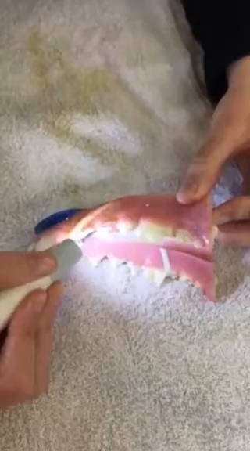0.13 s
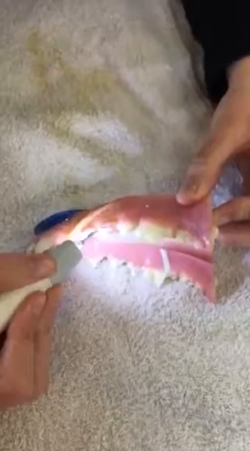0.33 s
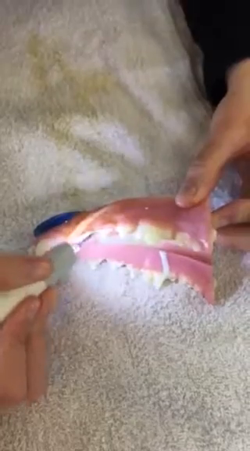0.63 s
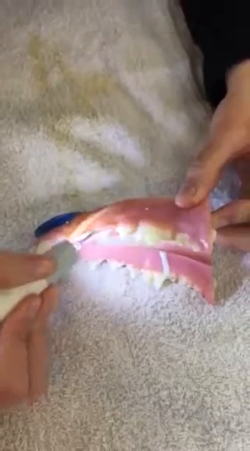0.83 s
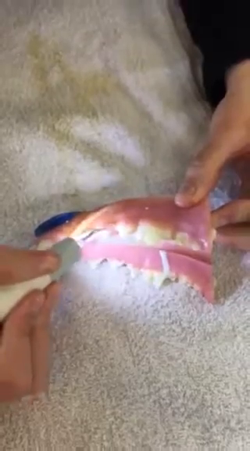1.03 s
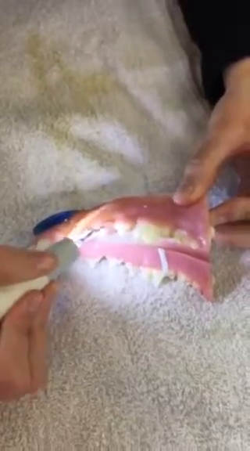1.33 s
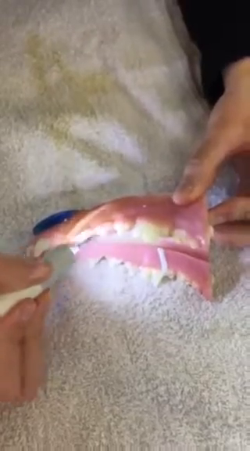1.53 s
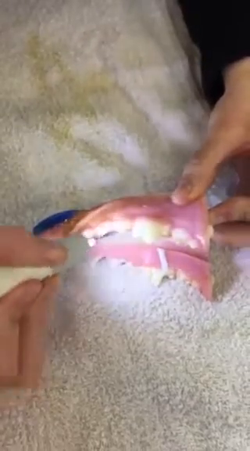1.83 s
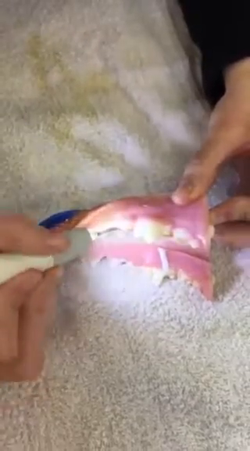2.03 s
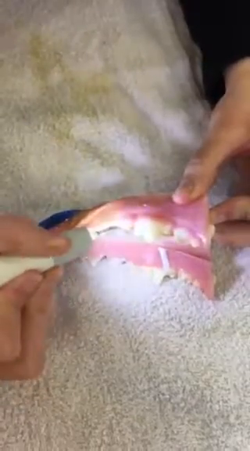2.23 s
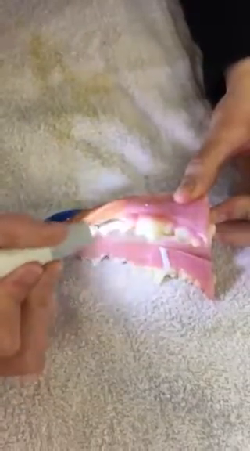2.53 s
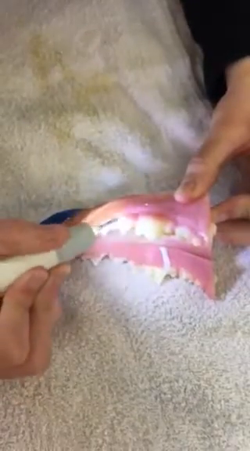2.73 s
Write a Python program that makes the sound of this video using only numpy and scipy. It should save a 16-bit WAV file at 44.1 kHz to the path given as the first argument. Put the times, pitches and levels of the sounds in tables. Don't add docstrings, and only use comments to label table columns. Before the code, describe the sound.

A dental scaler sprays a steady bright hiss with quick wet ticks close to the microphone; sharp squeals come early, then soft bumps and cloth rubs as hands shift the tooth model on a towel.

```python
import sys
import numpy as np
from scipy import signal
from scipy.fft import rfft, irfft
from scipy.io import wavfile
from scipy.ndimage import uniform_filter1d

SR = 44100
rng = np.random.default_rng(int(sys.argv[2]) if len(sys.argv) > 2 else 0)


def attenuation_scalar(level_db):
    decades = np.asarray(level_db, float) / 20
    return 10 ** decades


def persist_wave(psi):
    counts = np.round(np.clip(psi, -1, 1) * 32767).astype(np.int16)
    wavfile.write(sys.argv[1], SR, np.atleast_2d(counts).T)


N = 127890


def evened(x):
    return x / np.sqrt(np.mean(x ** 2) + 1e-20)


def curve(points, col=1):
    rows = np.array(points)
    return np.interp(np.arange(N) / SR, rows[:, 0], rows[:, col])


def add(mix, s, sound):
    part = mix[max(round(s * SR), 0):][:len(sound)]
    part += sound[:len(part)]


def coloured(x, points):
    hz, db = np.transpose(points)
    at = np.log(np.fft.rfftfreq(len(x), 1 / SR) + 1)
    gain = attenuation_scalar(np.interp(at, np.log(hz), db, right=-70))
    return evened(irfft(rfft(x) * gain, len(x)))


def bell(hz, centre_hz, width):
    return 1 / (1 + (2 * (hz - centre_hz) / width) ** 2)


def rung(x, modes):
    hz = np.fft.rfftfreq(len(x), 1 / SR)
    gain = sum(attenuation_scalar(db) * bell(hz, f, w) for f, w, db in modes)
    return irfft(rfft(x) * gain, len(x))


def wander(smooth_s):
    size = max(int(smooth_s * SR), 1)
    once = uniform_filter1d(rng.standard_normal(N), size)
    return evened(uniform_filter1d(once, size))


def grainy(per_s, spread_db, share):
    size = attenuation_scalar(spread_db * np.minimum(rng.exponential(1, N), 5))
    size = size * (rng.random(N) < per_s / SR)
    grains = evened(size * rng.choice([-1, 1], N))
    return (1 - share) * rng.standard_normal(N) + share * grains


def swell(length, rise):
    u = np.arange(0, 1, 1 / (length * SR))
    return np.sin(np.pi * u ** rise) ** 1.2


# time in seconds, spray level in dB, contact from 0 free to 1 pressed on the tooth.
MIST = [(0, -51, 0.41), (.1, -49.5, 0.61), (.2, -51.5, 0.3), (.5, -52.5, 1), (.56, -49, 0.046),
        (1.14, -48, 0.059), (1.21, -49, 0.86), (1.58, -53, 0.63), (1.68, -48.5, 0.019), (1.9, -47, 0.13),
        (2.05, -50, 0.16), (2.5, -49, 0.096), (2.9, -51, 0.26)]
# resonance in Hz, width in Hz, level in dB.
FREE_TIP = [
    (5940, 510, 4),
    (5280, 610, 0),
    (7077, 620, 5),
    (4830, 1400, -18),
    (2400, 300, -30),
]
# resonance in Hz, width in Hz, level in dB.
PRESSED_TIP = [
    (6460, 450, 6),
    (9013, 1780, 3.5),
    (3910, 1790, 0.5),
    (8160, 400, -13),
    (2880, 1200, -35),
]


def spray():
    contact = np.clip(curve(MIST, col=2), 0, 1)
    free = rung(grainy(per_s=2500, spread_db=2, share=.4), FREE_TIP)
    pressed = rung(grainy(per_s=2500, spread_db=2, share=.4), PRESSED_TIP)
    mix = np.sqrt(1 - contact) * free + np.sqrt(contact) * pressed
    level_db = curve(MIST) + 1.5 + 1.6 * wander(.012)
    return mix / np.std(free) * attenuation_scalar(level_db)


# time in seconds, effort in dB.
EFFORT = [(0, -63), (.15, -56), (.3, -65.5), (.62, -70.5), (.9, -55), (1.06, -57), (1.2, -64), (1.42, -55),
          (1.6, -59.5), (1.76, -73.5), (1.9, -61.5), (2.02, -50), (2.15, -57), (2.55, -56), (2.68, -65.5),
          (2.9, -59)]
# frequency in Hz, level in dB per Hz.
RUMBLE_COLOUR = [(20, -45), (40, -5), (70, 3), (200, -9.5), (500, -20), (1200, -29.5), (4000, -27.5)]
# frequency in Hz, level in dB per Hz.
TOWEL_COLOUR = [(100, -5), (350, -5), (700, -6), (1200, -15), (2600, -19.5), (4500, -17.5)]


def hands():
    effort_db = curve(EFFORT)
    lift_db = effort_db - effort_db.mean()
    rumble_db = -50.5 + 0.33 * lift_db + 1.2 * wander(0.02)
    rumble = coloured(rng.standard_normal(N), RUMBLE_COLOUR) * attenuation_scalar(rumble_db)
    towel_db = effort_db + .4 * lift_db - 1.5 + 2.8 * wander(.01)
    towel = coloured(grainy(per_s=500, spread_db=2.2, share=.4), TOWEL_COLOUR) * attenuation_scalar(towel_db)
    return rumble + towel


def crackle():
    per_s, level_db = 90, -61
    size = attenuation_scalar(3 * np.minimum(rng.exponential(1, N), 3)) * (rng.random(N) < per_s / SR)
    burst = signal.oaconvolve(size, np.hanning(130), "same") * rng.standard_normal(N)
    return attenuation_scalar(level_db) * evened(rung(burst, [(4430, 2600, 4.5), (2400, 570, -5.5)]))


# start in seconds, level in dB, pitch in Hz.
SOFT_BUMPS = [(0.003, -37.5, 177), (.137, -40.5, 110), (.482, -43, 170), (0.523, -46.5, 118),
              (0.635, -44.5, 180), (0.858, -37.5, 137), (0.883, -34, 110), (0.906, -38, 200),
              (.924, -37, 200), (0.933, -37.5, 110), (1.019, -38, 190), (1.073, -41, 250),
              (1.088, -39.5, 250), (1.137, -42.5, 110), (1.283, -40, 102), (1.349, -41.5, 108),
              (1.499, -40.5, 102), (1.512, -40, 110), (1.589, -40, 148), (1.635, -34.5, 137),
              (1.737, -49.5, 130), (1.841, -40, 190), (1.978, -35, 110), (1.994, -36, 90),
              (2.149, -34, 120), (2.182, -34, 105), (2.591, -35.5, 150), (2.779, -32.5, 102),
              (2.875, -38, 196), (2.887, -34.5, 129)]


def bumps():
    attack_s, sweep_s, sweep_turns, decay_cycles = 0.0014, .0022, 1.0, 0.8
    out, t = np.zeros(N), np.arange(0, .04, 1 / SR)
    for s, db, hz in SOFT_BUMPS:
        turns = hz * t + sweep_turns * (1 - np.exp(-t / sweep_s))
        shape = np.minimum(t / attack_s, 1) * np.exp(-t * hz / decay_cycles)
        add(out, s, attenuation_scalar(db + 0.5) * np.sin(2 * np.pi * turns) * shape)
    return out


# time in seconds, splash in dB, low ring in dB, low ring pitch in Hz.
EARLY_TICKS = [(0.086, -42, -48, 2150), (0.1194, -40, -47, 2030), (0.188, -41.5, -49, 2314),
               (0.3833, -36, -64, 2960), (0.415, -34.5, -57, 3140), (0.5326, -45, -51, 2480),
               (0.5631, -53, -72, 2970), (0.622, -37, -53, 2910), (0.6516, -39, -68, 2090),
               (0.6784, -62, -51, 2260), (0.7023, -58, -53, 1970), (0.726, -41.5, -49.5, 2370),
               (0.763, -44, -43.5, 2155), (0.8088, -35.5, -47, 2150), (0.844, -45, -52, 1940),
               (0.886, -44, -51, 2550), (0.9044, -39, -56, 2240), (0.9287, -39, -48.5, 2370),
               (0.974, -45, -68, 1980), (0.9866, -48, -44.5, 3230), (1.0152, -46, -45, 3010),
               (1.092, -44, -50, 3020), (1.1358, -51, -54, 2850), (1.2392, -41.5, -50, 2520),
               (1.2964, -43, -66, 1930), (1.3474, -39, -52, 2500), (1.3542, -34, -60, 3020),
               (1.4074, -51, -54, 2400)]
# time in seconds, splash in dB, low ring in dB, low ring pitch in Hz.
LATE_TICKS = [(1.4497, -41.5, -63, 2960), (1.5, -38, -49, 2430), (1.5928, -42, -54, 3100),
              (1.6342, -35.5, -49.5, 2340), (1.6404, -46, -41.5, 3210), (1.6744, -46, -56, 2320),
              (1.687, -34, -54, 2400), (1.76, -38, -72, 2930), (1.8083, -56, -56, 2790),
              (1.886, -51, -59, 2960), (1.9435, -51, -49, 2400), (1.9895, -45, -50, 1900),
              (2.0174, -48, -56, 2130), (2.044, -40, -55, 2350), (2.1266, -38.5, -50, 2520),
              (2.1624, -51, -49, 3220), (2.3094, -36, -45.5, 2110), (2.3516, -50, -47, 2080),
              (2.475, -49, -45, 2510), (2.525, -39, -58, 2280), (2.5711, -52, -57, 1940),
              (2.6497, -40, -49.5, 2080), (2.6614, -39, -54, 2250), (2.6955, -35, -66, 3200),
              (2.7464, -42, -55, 3060), (2.7789, -38, -48.5, 2960), (2.831, -34.5, -49, 2880),
              (2.8739, -39.5, -54, 2230)]


def ticks():
    rise_s, fall_s = .004, .0035
    out, t = np.zeros(N), np.arange(0, .03, 1 / SR)
    release = np.exp(-(np.maximum(t - rise_s, 0) / fall_s) ** 2 / 2)
    shape = np.minimum(t / rise_s, 1) ** 2 * release
    for s, db, low_db, hz in EARLY_TICKS + LATE_TICKS:
        splash_noise, ring_noise = rng.standard_normal((2, len(t)))
        splash = evened(rung(splash_noise, [(4400, 800, 0), (5900, 900, -5)]))
        ring = .4 * np.sin(2 * np.pi * hz * t) + .5 * evened(rung(ring_noise, [(hz, 500, 0)]))
        add(out, s - .002, shape * (attenuation_scalar(db - 7.5) * splash + attenuation_scalar(low_db + 3.0) * ring))
    return out


def squeal(rows, modes_hz, roughs, rise):
    out = np.zeros(N)
    for s, length, *levels in rows:
        shape = swell(length, rise)
        t = s + np.arange(len(shape)) / SR
        noise = rng.standard_normal((5, 4096))
        flutter = attenuation_scalar(2.16 * evened(uniform_filter1d(noise[4], size=90))[:len(t)])
        for hz, rough, db, v in zip(modes_hz, roughs, levels, noise):
            chatter = evened(rung(v, [(hz, 480, 0)])[:len(t)])
            glide_s = t + 0.36 * (t - s) ** 2
            tone = np.sqrt(2) * np.sin(2 * np.pi * hz * glide_s)
            voice = evened(flutter * ((1 - rough) * tone + rough * chatter))
            add(out, s, attenuation_scalar(db - 1.0) * shape * voice)
        rattle_modes = [(2450, 300, 0), (0.95 * modes_hz[1], 1200, 3), (3200, 700, -4)]
        rattle = evened(rung(noise[3], rattle_modes)[:len(t)])
        add(out, s, attenuation_scalar(levels[1] - 16.5) * shape * rattle)
    return out


# start in seconds, length in seconds, low, middle and high mode in dB.
ROUGH_SQUEALS = [
    (.115, 0.061, -52, -45.5, -46),
    (.233, 0.017, -44, -39, -38),
    (.243, 0.011, -45, -44, -40),
    (.284, .012, -46, -43, -44),
    (.444, 0.016, -46, -47, -40),
    (.455, 0.029, -31, -32.5, -33.5),
    (.490, 0.016, -37, -36.5, -36.5),
    (.506, 0.02, -42, -32, -36.5),
    (.322, 0.017, -47, -44.5, -44),
    (.349, 0.009, -62, -39, -54),
]
# start in seconds, length in seconds, low, middle and high mode in dB.
CLEAN_SQUEALS = [
    (.294, 0.035, -45, -30.5, -32.5),
    (.300, 0.022, -29, -62, -62),
    (.34, 0.0084, -56, -38, -41),
]
# start in seconds, length in seconds, low, middle and high mode in dB.
BITING_SQUEAL = [
    (.491, 0.044, -52, -31, -34.5),
]


def tip_squeals():
    tip_hz, chattering, gripping = (4190, 5970, 8480), (.9, 0.7, 0.7), (.2, .3, .35)
    rough = squeal(ROUGH_SQUEALS, tip_hz, chattering, rise=0.73)
    clean = squeal(CLEAN_SQUEALS, tip_hz, gripping, rise=.9)
    return rough + clean + squeal(BITING_SQUEAL, tip_hz, gripping, rise=0.62)


# start in seconds, level in dB, fall time in seconds.
CLOTH_DRAGS = [
    (2.234, -34, 0.047),
    (2.412, -36.5, 0.056),
    (2.215, -48, .02),
    (2.33, -54, 0.092),
    (2.005, -50.5, 0.064),
    (2.09, -50.5, 0.11),
    (.995, -53, .06),
    (.7, -55.5, .03),
]
# frequency in Hz, level in dB per Hz.
CLOTH_COLOUR = [(200, -30), (500, -5), (1000, -5), (1800, -1), (3080, -4), (3220, -21), (4500, -19),
                (6000, -30)]
# frequency in Hz, width in Hz, level in dB.
PLASTIC_BODY = [
    (175, 70, 0),
    (330, 120, -7),
    (520, 200, -12),
]


def drags():
    rise_s, body_lag_s, body_db = 0.018, .013, -2.5
    t, shape = np.arange(0, .3, 1 / SR), np.zeros(N)
    for s, db, fall_s in CLOTH_DRAGS:
        trail = np.exp(-np.maximum(t - rise_s, 0) / fall_s)
        add(shape, s, attenuation_scalar(db) * np.minimum(t / rise_s, 1) ** 2 * trail)
    boom = evened(rung(rng.standard_normal(N), PLASTIC_BODY))
    body = attenuation_scalar(body_db) * np.roll(shape, round(body_lag_s * SR)) * boom
    return shape * coloured(grainy(per_s=1800, spread_db=1.8, share=0.4), CLOTH_COLOUR) + body


# start in seconds, length in seconds, low, middle and high mode in dB.
GAP_SQUEAL = [
    (1.169, .016, -33, -42, -33),
    (1.158, .056, -62, -60, -45),
]


def gap_squeal():
    return squeal(GAP_SQUEAL, modes_hz=(3580, 4780, 8380), roughs=(.2, .25, .15), rise=.65)


# start in seconds, length in seconds, level in dB, pitch in Hz, width in Hz.
JAW_RUBS = [
    (1.396, .06, -47.5, 347, 90),
    (2.014, 0.057, -50.5, 444, 219),
]


def hollow_rubs():
    out = np.zeros(N)
    for s, length, db, hz, width in JAW_RUBS:
        shape = swell(length, rise=.7)
        note = rung(rng.standard_normal(8192), [(hz, width, 0)])[:len(shape)]
        add(out, s, attenuation_scalar(db) * shape * evened(note))
    return out


# start in seconds, length in seconds, level in dB, centre in Hz.
GUM_SCRAPES = [
    (1.709, 0.05, -43.5, 4040),
    (1.837, 0.03, -42, 3934),
    (1.872, 0.019, -45, 3820),
]


def scrapes():
    out, t = np.zeros(N), np.arange(0, .008, 1 / SR)
    for s, length, db, hz in GUM_SCRAPES:
        shape = swell(length, rise=1.06)
        rasp = 0.34 * evened(rung(rng.standard_normal(len(shape)), [(hz, 1100, 0)]))
        for at, pitch in rng.random((int(length * 300), 2)):
            chirp_hz = hz * (.8 + .45 * pitch)
            chirp = np.sin(2 * np.pi * chirp_hz * (t - 15.9 * t ** 2)) * np.hanning(len(t))
            add(rasp, at * length, chirp)
        add(out, s, attenuation_scalar(db) * shape * evened(rasp))
    return out


# centre in Hz, width in Hz, depth from 0 to 1.
PATH_NULLS = [
    (6680, 300, .96),
    (4930, 170, .8),
    (3450, 300, .85),
]


def through_nulls(x):
    hz, t, z = signal.stft(x, SR, nperseg=512)
    at = np.minimum(t * SR, N - 1).astype(int)
    for (f, width, depth), drift in zip(PATH_NULLS, (.006, .01, .04)):
        shift, fill = wander(0.091)[at], wander(0.091)[at]
        open_depth = depth ** (1 + np.maximum(fill, 0) * 6)
        centre_hz = f * (1 + drift * shift)
        z = z * (1 - open_depth * np.exp(-((hz[:, None] - centre_hz) / width) ** 2))
    return signal.istft(z, SR, nperseg=512)[1][:N]


def scene():
    tip = spray() + ticks() + crackle() + tip_squeals() + scrapes()
    near = through_nulls(tip + hands() + drags())
    return (near + gap_squeal() + bumps() + hollow_rubs())[None]


def gate(x):
    knee_hz, rise_db_per_khz = 7555, 9
    hz, _, z = signal.stft(x, SR, nperseg=2048, noverlap=1024)
    power = abs(z[:1024]) ** 2 + 1e-20
    band = power.reshape(128, 8, -1).mean(1)
    near = uniform_filter1d(band, size=9, axis=0) + 1e-20
    band_db, near_db = 10 * np.log10([band, near])
    mid_hz = hz[4:1024:8, None]
    high = mid_hz > knee_hz
    budget = evened(uniform_filter1d(rng.standard_normal(band.shape[1]), size=4))
    slope_db = (mid_hz - knee_hz) / 1000 * rise_db_per_khz * (0.33 + 0.87 * budget)
    top_db = np.median(band_db[24:44], 0) - 13.0 + slope_db
    chance = evened(uniform_filter1d(rng.standard_normal(band.shape), size=3, axis=1))
    bar_db = np.where(high, top_db - 7.0 * chance, near_db - 9.5 - 4.5 * chance)
    strong = 10 * np.log10(power) > np.repeat(near_db + 5.0 * high, 8, 0) - 8.5
    keep = np.repeat(band_db > bar_db, 8, 0) & strong | (hz[:1024, None] < 1250)
    patchy = z[:1024] * keep * attenuation_scalar(2 * np.repeat(chance, 8, 0))
    return signal.istft(np.vstack([patchy, z[1024:]]), SR, nperseg=2048, noverlap=1024)[1][:N]


def roll_off(x):
    return signal.sosfilt(signal.butter(12, 10290, fs=SR, output="sos"), x)


def record(dry):
    hz = np.fft.rfftfreq(N, 1 / SR)
    treble = 1 / (1 + (hz / 9250) ** 20.0)
    bass = hz ** 2 / (hz ** 2 + 28 ** 2)
    rolled = irfft(rfft(dry) * treble * bass, N)
    return roll_off(gate(rolled[0])[None])


dry = scene()
out = record(dry)
persist_wave(out)
```